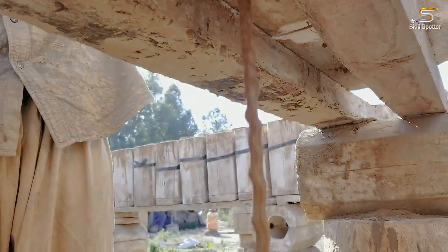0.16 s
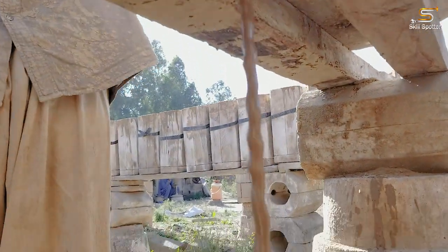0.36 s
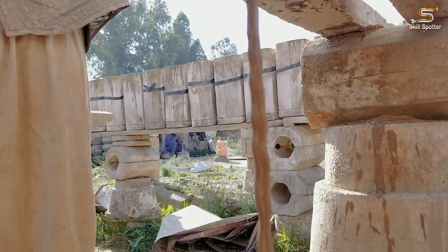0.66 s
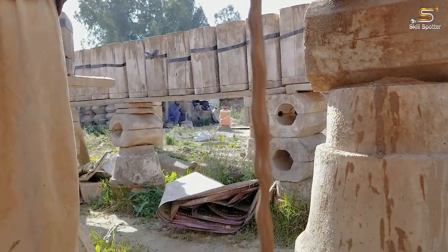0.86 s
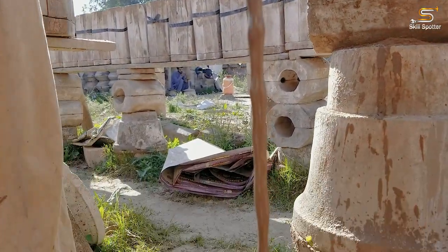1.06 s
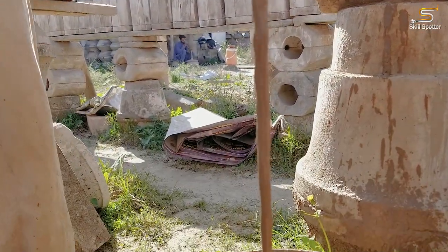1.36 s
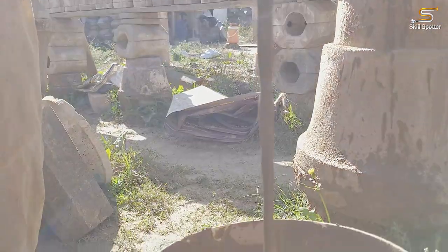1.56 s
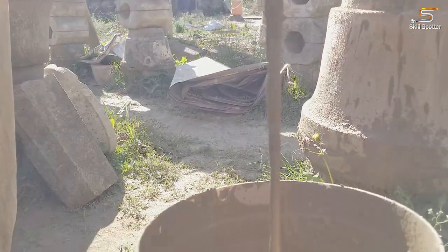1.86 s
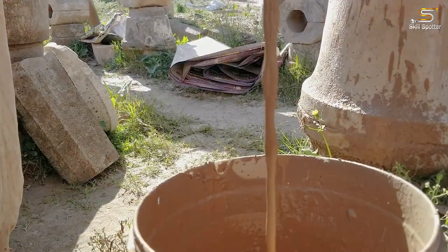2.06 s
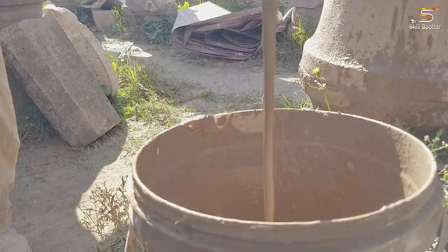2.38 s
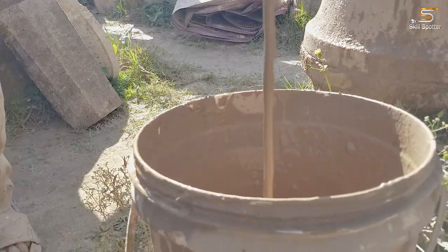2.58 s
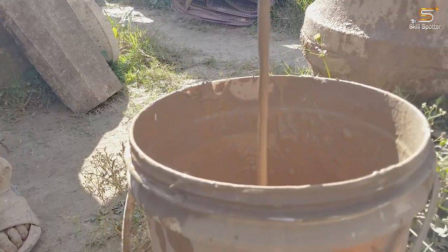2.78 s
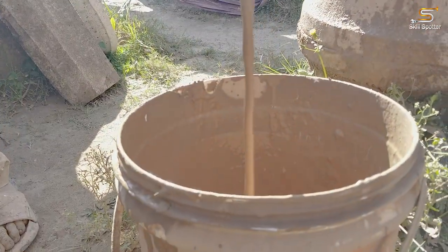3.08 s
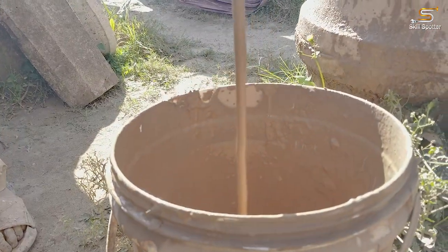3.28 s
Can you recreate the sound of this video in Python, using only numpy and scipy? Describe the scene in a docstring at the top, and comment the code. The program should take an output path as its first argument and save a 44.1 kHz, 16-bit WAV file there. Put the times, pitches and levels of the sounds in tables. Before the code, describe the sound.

Continuous wet spatter of thick clay falling into a bucket, with small bubbles, pops and sharp flecks. The moving microphone comes closer, bringing out bucket resonance and bright sizzle over soft outdoor rumble and breeze.

```python
"""A rope of liquid clay falls into a plastic bucket in a quiet yard while the microphone sinks towards the rim.
The splashing is filtered random crackle plus many small bubbles, each a damped sine rising in pitch.
Larger bubbles, bursting air pockets and sharp flecks of clay stand out; lumps drum on the bottom as modal rings.
The hollow of the bucket resonates more as it comes near, and filtered noise gives a low rumble and a breeze."""
import sys
import numpy as np
from scipy import signal
from scipy.fft import rfft, irfft, next_fast_len
from scipy.io import wavfile
from scipy.ndimage import uniform_filter1d

SR = 44100
rng = np.random.default_rng(int(sys.argv[2]) if len(sys.argv) > 2 else 0)


def store_pcm(level_fs):
    """Save levels as 16-bit WAV."""
    pcm = np.round(np.clip(level_fs, -1, 1) * 32767).astype(np.int16)
    wavfile.write(sys.argv[1], SR, np.atleast_2d(pcm).T)


N = 151263


def undb(db):
    """Logarithmic level: decibels to amplitude gain."""
    return 10 ** (np.asarray(db) / 20)


def unit(x):
    """Normalization: scale to rms 1."""
    return x / np.sqrt(np.mean(x ** 2))


def ramp(start, end):
    """Linear interpolation: a steady change over the whole pour."""
    return np.linspace(start, end, N)


def follow(table):
    """Piecewise-linear interpolation: each column after start_s becomes a curve in time."""
    times, *columns = np.array(table, float).T
    seconds = np.arange(N) / SR
    return [np.interp(seconds, times, column) for column in columns]


def walk(rate):
    """Smoothed random steps: a wandering curve of rms 1 with `rate` new values a second."""
    hold = max(int(SR / rate), 1)
    steps = np.repeat(rng.standard_normal(N // hold + 1), hold)
    return unit(uniform_filter1d(steps, hold)[:N])


def colour(x, points):
    """Spectral shaping: filter by (pitch_hz, level_db) points, interpolated over log frequency."""
    hz, db = np.array(points, float).T
    size = next_fast_len(N + 4096)
    f = np.maximum(np.fft.rfftfreq(size, 1 / SR), 1)
    gain = undb(np.interp(np.log(f), np.log(hz), db))
    return irfft(rfft(x, size) * gain, size)[..., :N]


def ring(x, hz, width_hz):
    """Simple resonance: one second-order peak, gain 1 at its centre."""
    return signal.lfilter(*signal.iirpeak(hz, hz / width_hz, fs=SR), x)


def band(x, hz, width_hz):
    """Cascaded resonance: two equal peaks in series give steeper sides."""
    return ring(ring(x, hz, width_hz), hz, width_hz)


def glide(x, hz, width_hz):
    """Heterodyne filtering: shift down, low-pass and shift back, so the centre can move; rms 1."""
    turn = np.exp(2j * np.pi * np.cumsum(hz) / SR)
    low_pass = signal.butter(2, width_hz / 2, fs=SR, output="sos")
    return unit((signal.sosfilt(low_pass, x / turn) * turn).real)


def stereo(mid, side):
    """Sum and difference: mid and side to left and right."""
    return np.array([mid + side, mid - side])


def pan(db):
    """Interchannel level difference: left and right gains; positive is louder on the left."""
    return undb(np.array([[.5], [-.5]]) * db)


def add(out, start, sound):
    """Superposition: mix a short sound in at a time in seconds."""
    i = max(int(start * SR), 0)
    part = out[:, i:i + sound.shape[-1]]
    part += sound[..., :part.shape[-1]]


SPARSE_START = .45  # share of the full burst rate at the start


def crackle(rate, spread_db, decay_s):
    """Shot noise: two unrelated noise rows share random decaying bursts, which grow denser; rms 1."""
    density = ramp(SPARSE_START, 0.96)
    strength = undb(spread_db * np.minimum(rng.exponential(size=N), 5))
    hits = (rng.random(N) < density * rate / SR) * strength
    # dividing by density keeps the mean power steady
    power = signal.lfilter([1], [1, -np.exp(-2 / (decay_s * SR))], hits ** 2 / density)
    return unit(np.sqrt(power) * rng.standard_normal((2, N)))


BUBBLE_RISE = 0.025  # share of the pitch gained per decay time


def bubble(hz, cycles, skew):
    """Damped oscillation: rising pitch, decay time in cycles, skew in radians between left and right."""
    age = np.arange(int(5 * cycles / hz * SR)) / SR * hz / cycles  # in decay times
    phase = 2 * np.pi * cycles * (age + BUBBLE_RISE * age ** 2 / 2)
    envelope = np.exp(-age) * (1 - np.exp(-10 * age))
    return np.sin(phase + np.array([[.5], [-.5]]) * skew) * envelope


# spectrum of the yard's rumble: pitch_hz, level_db
YARD_COLOUR = [(20, -16), (45, -18.5), (65, -9.5), (110, 2.5), (170, -6), (240, -13.5), (420, -21.5),
               (700, -36.5), (2000, -23.5), (16000, -44)]
YARD_DB, YARD_SIDE_DB = -45.5, -17
# spectrum of the breeze on the microphone: pitch_hz, level_db
BREEZE_COLOUR = [(20, -12), (35, -4), (65, 4), (95, -10), (140, -13), (400, -37)]
BREEZE_START_DB, BREEZE_END_DB = -60.5, -52


def yard():
    """Broadband noise: low rumble of the open air, and a breeze that picks up on the microphone."""
    mid, side = unit(colour(rng.standard_normal((2, N)), YARD_COLOUR))
    rumble = stereo(mid, undb(YARD_SIDE_DB) * side) * undb(YARD_DB)
    gust, across = unit(colour(rng.standard_normal((2, N)), BREEZE_COLOUR))
    breeze = stereo(gust, 0.22 * across) * undb(ramp(BREEZE_START_DB, BREEZE_END_DB))
    return rumble + breeze


# spectrum of the slopping pool: pitch_hz, level_db
SLOSH_COLOUR = [(120, -44), (200, 1), (330, 3), (410, -12), (500, -3), (620, -12), (900, -29.5)]
SLOSH_DB, SLOSH_FOLLOW = -35.5, 0.5  # offset, and share of the spatter's level curve added to it


def slosh():
    """Filtered shot noise: soft, low slopping of the thick pool."""
    mid, side = unit(colour(crackle(rate=240, spread_db=3.3, decay_s=0.0091), SLOSH_COLOUR))
    return stereo(mid, 0.76 * side)


# low gurgle heard from above the rim: start_s, level_db, pitch_hz
GURGLE = [(0, -80, 850), (1.55, -52.5, 864), (2.1, -44, 820), (2.9, -41.5, 798), (3.43, -41.5, 710)]
GURGLE_WIDTH_HZ, GURGLE_SIDE_DB = 272, -13


def gurgle():
    """Moving resonance: splashes ring a low, broad band that sinks and swells towards the end."""
    db, hz = follow(GURGLE)
    mid, side = glide(crackle(rate=900, spread_db=2.0, decay_s=0.00067), hz, GURGLE_WIDTH_HZ)
    return stereo(mid, undb(GURGLE_SIDE_DB) * side) * undb(db)


# modes of the bucket's bottom under the clay: pitch_hz, t60_s, level_db, side_share
BOTTOM_MODES = [(70, 0.07, -22, .1), (142.3, 0.16, -5, .06), (165.4, 0.14, -12, .1),
                (279.8, 0.18, -8.5, 0.91)]
DRUM_START_DB, DRUM_END_DB = -45, -48


def drumming():
    """Modal excitation: the uneven stream patters on the bottom, softer as it smooths out."""
    patter = crackle(rate=340, spread_db=1.5, decay_s=0.0045)
    drive = colour(patter, [(30, -30), (70, 1), (330, -12), (600, -67), (2000, -47)])
    mid = side = 0
    for hz, t60, db, side_share in BOTTOM_MODES:
        width_hz = np.log(1000) / np.pi / t60
        mode = undb(db) * ring(drive, hz, width_hz)
        mid = mid + mode[0]
        side = side + side_share * mode[1]
    return stereo(mid, side) / np.std(mid) * undb(ramp(DRUM_START_DB, DRUM_END_DB))


# heavy lumps landing: start_s, level_db (before LUMP_DB), pitch_hz
LUMPS = [(0.015, -23.5, 134), (.071, -24, 149), (0.232, -25, 115.3), (0.304, -27, 132.5),
         (0.379, -23.5, 147), (0.444, -26, 142), (0.569, -25.5, 144.3), (.602, -32, 136), (.658, -25, 143),
         (0.713, -26.5, 128), (0.758, -28.5, 129), (.944, -29, 110), (1.574, -29, 152)]
LUMP_DB, LUMP_ATTACK_S, LUMP_DECAY_S, LUMP_OVERTONE_DB = -1.5, 0.005, 0.027, -11.5


def lumps():
    """Impact response: heavy lumps thump the bottom, a low note with the bottom's highest mode above it."""
    out, t = np.zeros((2, N)), np.arange(SR // 4) / SR
    overtone = undb(LUMP_OVERTONE_DB) * np.sin(2 * np.pi * BOTTOM_MODES[3][0] * t)
    envelope = (1 - np.exp(-t / LUMP_ATTACK_S)) * np.exp(-t / LUMP_DECAY_S)
    for start, db, hz in LUMPS:
        note = np.sin(2 * np.pi * hz * t) + overtone
        add(out, start, undb(db + LUMP_DB) * note * envelope)
    return out


# resonances of the air in the bucket: pitch_hz, width_hz (before broadening), level_db
AIR_MODES = [(771, 65, -2.5), (884, 32, 1.5), (916.5, 39.5, 5), (1225, 68, -1.5), (1503, 130, -3),
             (2043, 92, -1), (2325, 124, -2.5), (2602, 55, 3.5), (2840, 150, 0), (3365, 105, 0.5),
             (3595, 130, -2), (4070, 170, -2.5), (4460, 89, -1), (5690, 300, -11)]
HOLLOW_BROADEN = 1.8  # factor on every width
HOLLOW_DB, HOLLOW_SIDE_DB = 3, -8


def hollow():
    """Cavity resonance: the splashing rings the air in the bucket."""
    drive = np.hypot(*crackle(SPATTER_PER_S, SPATTER_SPREAD_DB, SPATTER_DECAY_S))
    rings = np.zeros((2, N))
    for hz, width_hz, db in AIR_MODES:
        noise = drive * rng.standard_normal((2, N))
        rings += undb(db) * band(noise, hz, HOLLOW_BROADEN * width_hz)
    mid, side = unit(rings)
    return stereo(mid, undb(HOLLOW_SIDE_DB) * side) * undb(HOLLOW_DB) * pan(db=3.5)


# sharp flecks striking the wall: start_s, level_db (before FLECK_DB and colouring)
FLECKS = [(.0154, -29.5), (.0894, -31), (0.372, -31), (0.418, -28), (0.452, -31), (0.8057, -19.5),
          (0.8804, -25), (.9443, -26), (1.0105, -23), (1.2436, -26), (1.346, -23), (1.414, -20.5),
          (2.301, -26), (2.726, -25), (2.7995, -22), (3.3096, -17.5)]
# spectrum of the flecks: pitch_hz, level_db
FLECK_COLOUR = [(1000, -20), (5000, -14), (9500, -8.5), (13000, -4.5), (16000, -8)]
FLECK_DB, FLECK_DECAY_S, FLECK_TAIL_DB, FLECK_TAIL_S = -1, .003, -8, .012


def flecks():
    """Impulsive noise: sharp spits of clay against the wall, each with a fast and a slower decay."""
    out, t = np.zeros((2, N)), np.arange(SR // 25) / SR
    envelope = np.exp(-t / FLECK_DECAY_S) + undb(FLECK_TAIL_DB) * np.exp(-t / FLECK_TAIL_S)
    for start, db in FLECKS:
        burst = stereo(*rng.standard_normal((2, len(t))))
        add(out, start, undb(db + FLECK_DB) * envelope * burst)
    return colour(out, FLECK_COLOUR)


# single larger bubbles: start_s, level_db, pitch_hz
BLIPS = [(.281, -35.5, 2030), (.311, -41, 2050), (.403, -35, 2070), (.424, -37, 1830), (0.581, -34, 3870),
         (0.823, -34, 1244), (.831, -38, 840), (0.842, -34.5, 2680), (0.846, -27, 4900), (1.001, -32, 1680),
         (1.076, -30.5, 3420), (1.242, -34, 923), (1.341, -33, 3420), (1.407, -29, 2610),
         (1.551, -28.5, 2160), (1.573, -30, 4070), (1.674, -27, 5300), (1.692, -29, 928),
         (1.892, -23, 6850), (1.913, -21.5, 3070), (1.934, -26, 5300), (2.101, -25.5, 900),
         (2.147, -23, 3540), (2.769, -26.5, 1560), (2.793, -23, 3520), (2.907, -25, 3900),
         (2.98, -23, 2750), (2.989, -21, 5750), (3.048, -22, 4100), (3.268, -20, 5800),
         (3.304, -23.5, 2820)]
BLIP_CYCLES, BLIP_SKEW = 14, .9  # decay time in cycles, left-right phase in radians
# low damped notes: the knock of the stream first landing (up to 0.017 s), then deep glugs of trapped air:
# start_s, level_db, pitch_hz
LOW_NOTES = [(0.013, -28.5, 279.8), (0.015, -36, 202), (.017, -43, 480), (0.885, -37, 198), (2.139, -37.5, 266),
             (2.229, -35, 214.5), (2.271, -35.5, 206)]
LOW_NOTE_CYCLES = 6.1  # decay time in cycles


def blips():
    """Bubble resonance: single bubbles stand out of the crackle as bright blips and deep glugs; the stream's
    first knock on landing rings as low notes too."""
    out = np.zeros((2, N))
    for start, db, hz in BLIPS:
        add(out, start, undb(db) * pan(db=1.5) * bubble(hz, BLIP_CYCLES, BLIP_SKEW))
    for start, db, hz in LOW_NOTES:
        add(out, start, undb(db) * bubble(hz, LOW_NOTE_CYCLES, 0.69))
    return out


# larger air pockets bursting: start_s, level_db, pitch_hz, left_minus_right_db
POPS = [(0.2305, -36, 3660, 4), (0.7037, -35, 2020, -2), (0.801, -26, 3850, -0.5), (0.9437, -32, 5400, 7),
        (1.139, -28, 4000, 5), (1.244, -30.5, 5280, 2), (1.3, -29, 2700, 1.5), (1.409, -22.5, 4560, 3),
        (1.651, -23.5, 3760, 2), (1.7698, -28.5, 2470, 3), (2.0292, -30.5, 3670, 9), (2.105, -27, 2670, 3),
        (2.292, -24, 3450, 6), (2.875, -30, 2320, 2.0), (3.1593, -29.5, 2710, 9), (3.232, -29.5, 2260, 6),
        (3.2945, -29.5, 3920, 6), (3.311, -24, 4600, 8)]
POP_DB, POP_CYCLES = 0, 20  # ring: level against the table, decay time in cycles
POP_WIDTH, POP_SIDE = 0.55, 0.48  # noise: bandwidth as a share of pitch, side gain
SNAP_DB, SNAP_DECAY_S, POP_SPLASH_DB, POP_DECAY_S = -7, .003, -9.5, 0.013


def pops():
    """Burst and resonance: each air pocket snaps open, rings briefly and leaves a splash of the same pitch."""
    out, t = np.zeros((2, N)), np.arange(SR // 20) / SR
    envelope = undb(SNAP_DB) * np.exp(-t / SNAP_DECAY_S) + undb(POP_SPLASH_DB) * np.exp(-t / POP_DECAY_S)
    for start, db, hz, pan_db in POPS:
        mid, side = unit(band(rng.standard_normal((2, len(t))), hz, POP_WIDTH * hz))
        add(out, start, undb(db) * pan(pan_db) * stereo(mid, POP_SIDE * side) * envelope)
        tone = bubble(hz, POP_CYCLES, BLIP_SKEW)
        add(out, start + 0.001036, undb(db + POP_DB) * pan(pan_db) * tone)
    return out


# spectrum of the fine spray: pitch_hz, level_db
SPRAY_COLOUR = [(2000, -28), (5000, -24), (7500, -1), (9700, -9.5), (12000, 3), (14000, 5.5), (16000, 2)]
SPRAY_PER_S, SPRAY_SPREAD_DB, SPRAY_DECAY_S = 1200, 3.5, 0.0029  # rate at full density
SPRAY_DB, SPRAY_FOLLOW, SPRAY_PAN_DB = -22.5, 0.59, -3.5  # follow: share of the spatter's level curve


def spray():
    """Filtered shot noise: bright ticks of the finest droplets."""
    ticks = crackle(SPRAY_PER_S, SPRAY_SPREAD_DB, SPRAY_DECAY_S)
    return stereo(*unit(colour(ticks, SPRAY_COLOUR))) * pan(SPRAY_PAN_DB)


# bright sizzle that clears the rim: start_s, level_db
SIZZLE = [(0, -64.5), (1.5, -43.5), (2.0, -42.5), (2.4, -46), (2.9, -37), (3.18, -37), (3.28, -36.5),
          (3.43, -36)]
# spectrum of the sizzle: pitch_hz, level_db
SIZZLE_COLOUR = [(2500, -37), (4500, 1), (6000, 2), (7500, 0), (9700, -8), (13500, -3), (16000, -15)]


def sizzle():
    """Acoustic shadowing: the brightest splash comes through as the microphone looks over the rim."""
    mid, side = unit(colour(crackle(rate=1500, spread_db=4.0, decay_s=0.0069), SIZZLE_COLOUR))
    return stereo(mid, 0.69 * side) * undb(follow(SIZZLE)[0]) * pan(db=3.0)


BUBBLE_DB, BUBBLES_PER_S, BUBBLE_SPREAD_DB, BUBBLE_FADE_IN_DB = -2.5, 650, 2.5, -4.5
BUBBLE_LOW_HZ, BUBBLE_HIGH_HZ = 1302, 5576
BUBBLE_CYCLES = 14.1  # mean decay time in cycles


def bubbles():
    """Bubble resonance: many small bubbles at random moments, quickly damped by the thick clay."""
    out = np.zeros((2, N))
    count = int(BUBBLES_PER_S * N / SR)
    for when, pitch, size, life, turn in rng.random((count, 5)):
        hz = BUBBLE_LOW_HZ * (BUBBLE_HIGH_HZ / BUBBLE_LOW_HZ) ** pitch
        loudness = undb(BUBBLE_SPREAD_DB * min(-np.log(1 - size), 4))
        gain = loudness * (hz / BUBBLE_LOW_HZ) ** 0.78
        skew = (2 * turn - 1) * min(hz / 1400, np.pi)
        add(out, when * N / SR, gain * bubble(hz, BUBBLE_CYCLES * (.5 + life), skew))
    return out / np.std(out.mean(axis=0)) * undb(BUBBLE_DB + ramp(BUBBLE_FADE_IN_DB, 0))


# spectrum of the spatter: pitch_hz, level_db
SPATTER_COLOUR = [(150, -23), (350, -5), (620, -16), (1050, -0.5), (1300, -0.5), (1750, -3), (2600, -7),
                  (4000, -5.5), (7000, -5), (9700, -12), (16000, -14.5)]
# stereo width of the spatter: pitch_hz, side_minus_mid_db
SPATTER_WIDTH = [(200, -21), (700, 0), (1300, -3), (2400, 2.5), (4400, 1.5), (8000, 1), (15000, 3)]
SPATTER_DB, SPATTER_PER_S, SPATTER_SPREAD_DB, SPATTER_DECAY_S = -3.5, 900, 2, 0.0023  # rate at full density


def spatter():
    """Filtered shot noise: wet crackle where the stream meets the pool."""
    mid, side = colour(crackle(SPATTER_PER_S, SPATTER_SPREAD_DB, SPATTER_DECAY_S), SPATTER_COLOUR)
    return stereo(mid, colour(side, SPATTER_WIDTH)) / np.std(mid) * undb(SPATTER_DB)


# echoes between the bucket's walls: delay_s, gain
ECHOES = [(.00221, .14), (.0054, .17)]


def walls(x):
    """Early reflection: the bucket's walls throw each splash straight back."""
    out = x.copy()
    for delay, gain in ECHOES:
        late = np.pad(x, ((0, 0), (int(delay * SR), 0)))[:, :N]
        out += gain * late
    return out


# moments when the stream thins and the splashing drops: start_s (centre of the dip), level_db
LULLS = [(.675, -1), (1.098, -1), (2.072, -6), (2.359, -6), (2.484, -6.5), (3.213, -6.5)]
LULL_S = 0.0094  # half-width of a dip at 1/e of its depth in dB


def lulls():
    """Amplitude modulation: gain of the splashing as the stream thins briefly."""
    t = np.arange(N) / SR
    return undb(sum(db * np.exp(-((t - when) / LULL_S) ** 2) for when, db in LULLS))


# nearness to the bucket: start_s, spatter_level_db, hollow_level_db
APPROACH = [(0, -52.5, -56), (.04, -40.5, -63), (.08, -52.5, -64), (.2, -45.5, -70), (.26, -46, -68),
            (.52, -46, -58.5), (.68, -44.5, -56), (.88, -40.5, -47.5), (1.06, -41.5, -51),
            (1.22, -40.5, -46.5), (1.48, -39, -45), (1.56, -36, -42.5), (1.85, -39, -41.5),
            (2.25, -35.5, -40.5), (2.48, -36, -40), (2.76, -37.5, -38.5), (3.1, -33, -41),
            (3.28, -34.5, -36.5), (3.43, -32.5, -42)]
SURGE_PER_S, SURGE_START_DB, SURGE_END_DB = 65, 3.5, 0.88  # rms swing of the stream
PAN_START_DB, PAN_END_DB = 1.5, 1
# a boxy band is lifted outside the rim and cut as the view opens; gains of the added band
BOXY_HZ, BOXY_WIDTH_HZ, BOXY_START, BOXY_END = 1260, 1700, 0.23, -0.51


def scene():
    """Superposition: the stream surges, and its splashing grows as the bucket comes near."""
    near_db, inside_db = follow(APPROACH)
    surge_db = ramp(SURGE_START_DB, SURGE_END_DB)
    surge = undb(surge_db * walk(SURGE_PER_S))
    bubbling = undb(surge_db * walk(SURGE_PER_S))
    thinning = lulls()

    splash = surge * spatter() + bubbling * bubbles()
    splash = splash * undb(near_db) * pan(ramp(PAN_START_DB, PAN_END_DB))
    splash += ramp(BOXY_START, BOXY_END) * ring(splash, BOXY_HZ, BOXY_WIDTH_HZ)
    splash = thinning * (splash + sizzle())
    splash += surge * spray() * undb(SPRAY_DB + SPRAY_FOLLOW * near_db)

    bucket = np.sqrt(surge * thinning) * hollow() * undb(inside_db)
    bucket += gurgle() + slosh() * undb(SLOSH_DB + SLOSH_FOLLOW * near_db)
    return yard() + drumming() + lumps() + bucket + flecks() + blips() + pops() + walls(splash)


TOP_HZ = 15750


def record(dry):
    """Band limiting: the recorder cuts the top with a steep low-pass."""
    return signal.sosfilt(signal.ellip(10, .2, 80, TOP_HZ, fs=SR, output="sos"), dry)


dry = scene()
out = record(dry)
store_pcm(out)
```